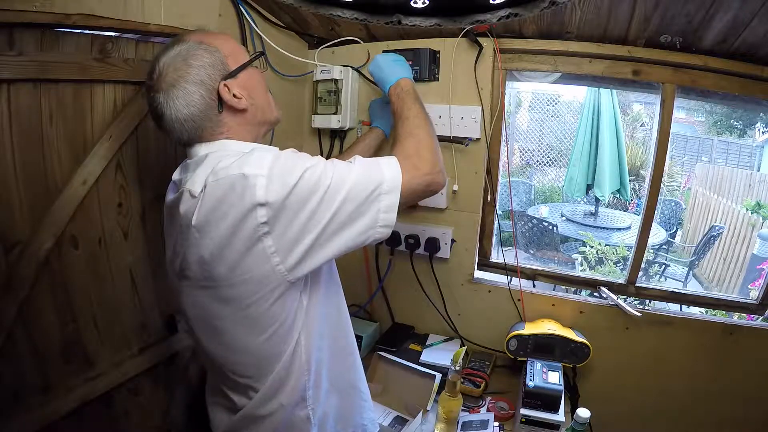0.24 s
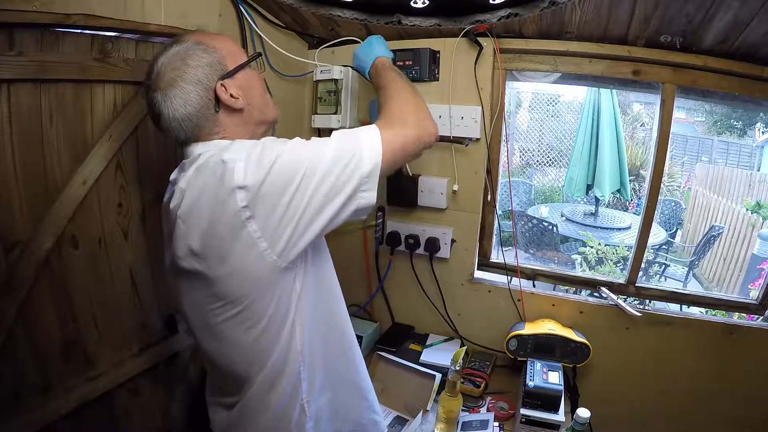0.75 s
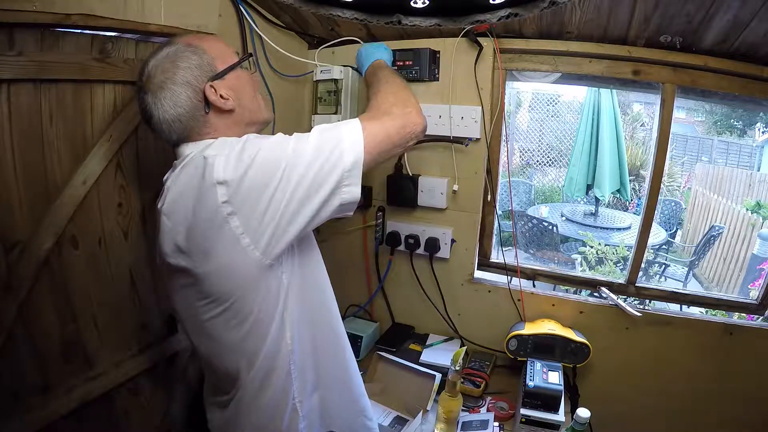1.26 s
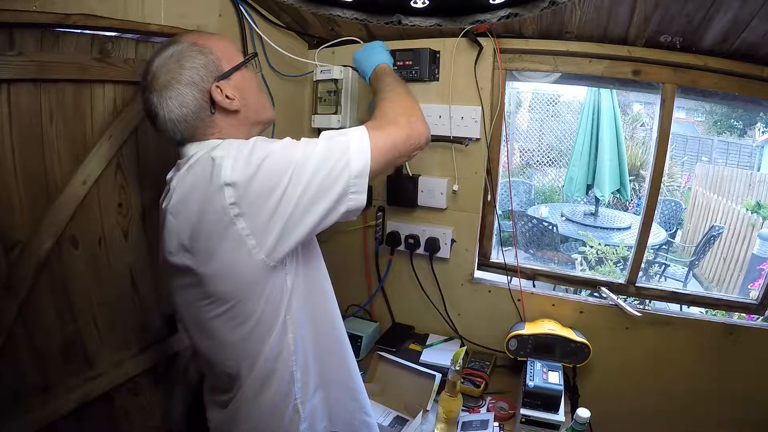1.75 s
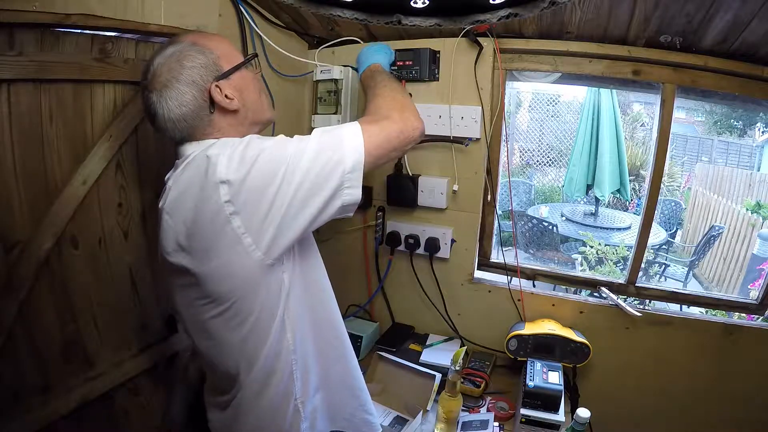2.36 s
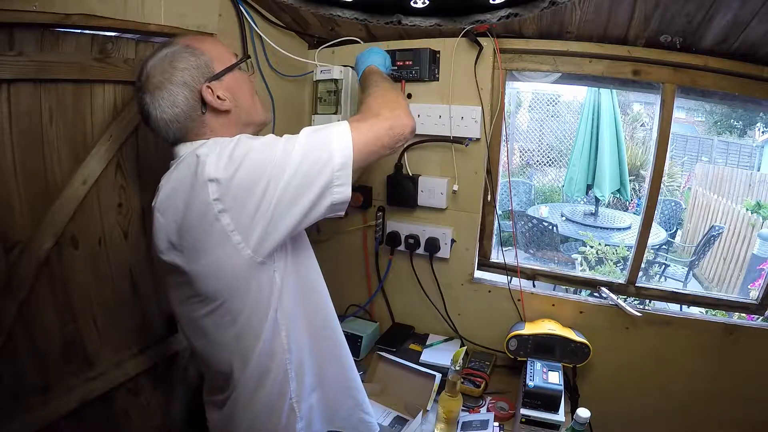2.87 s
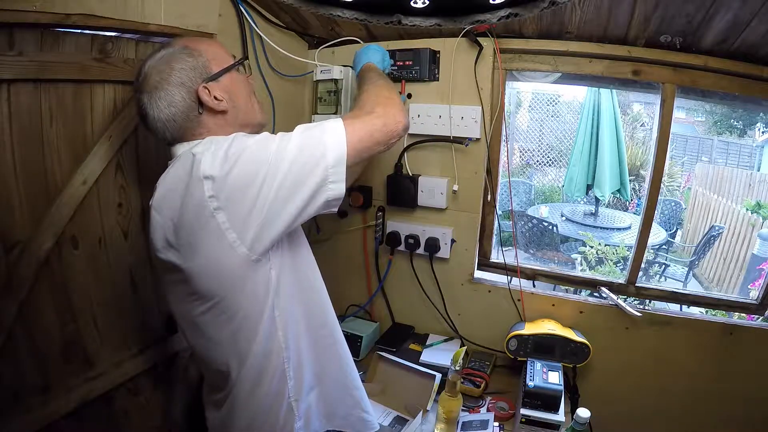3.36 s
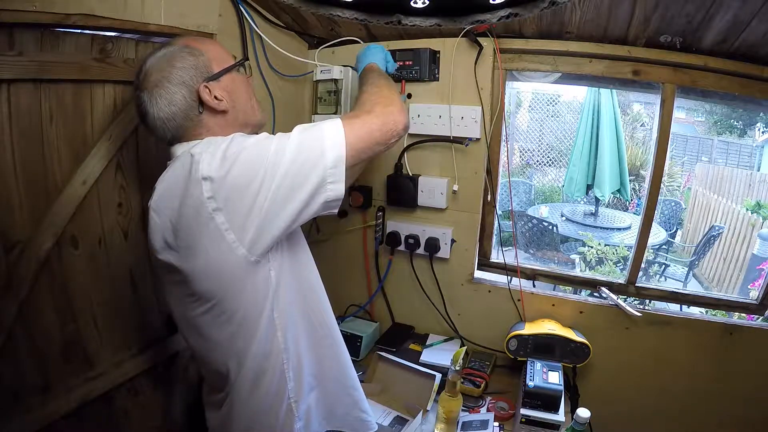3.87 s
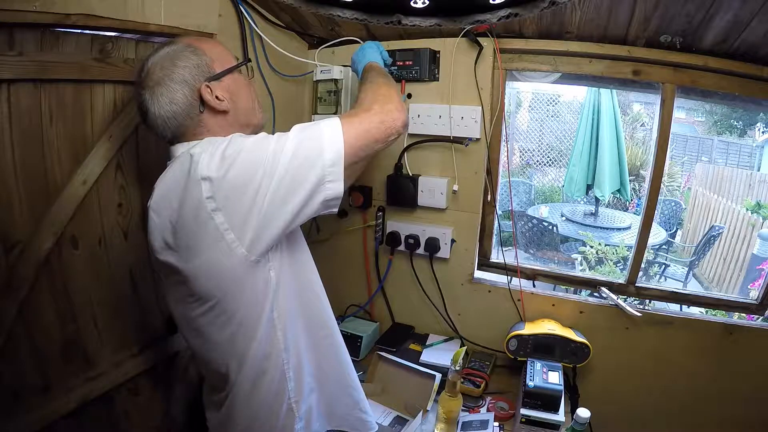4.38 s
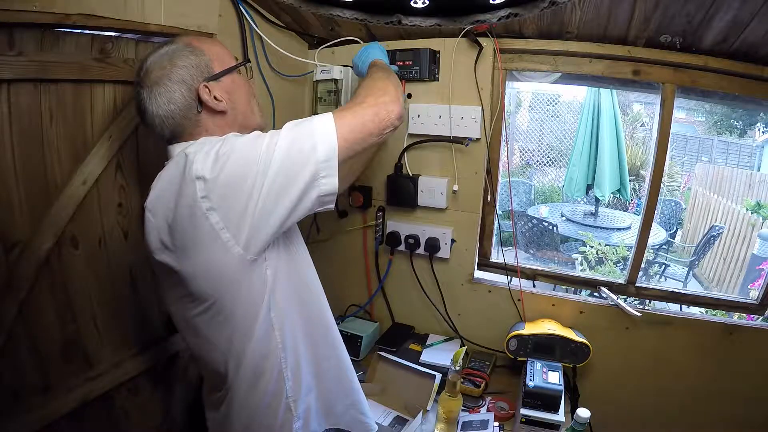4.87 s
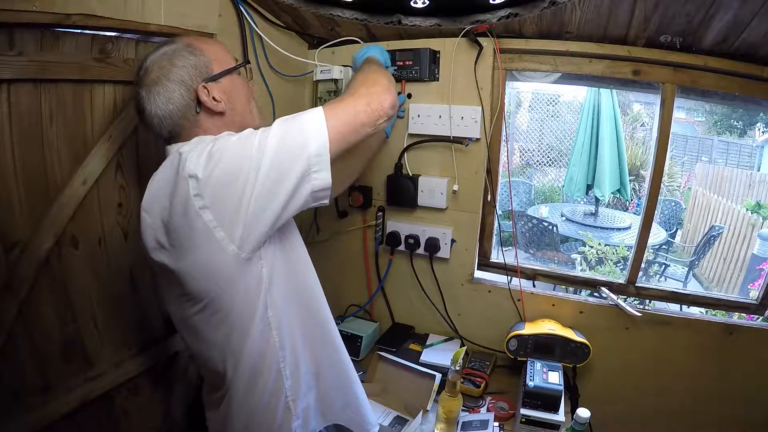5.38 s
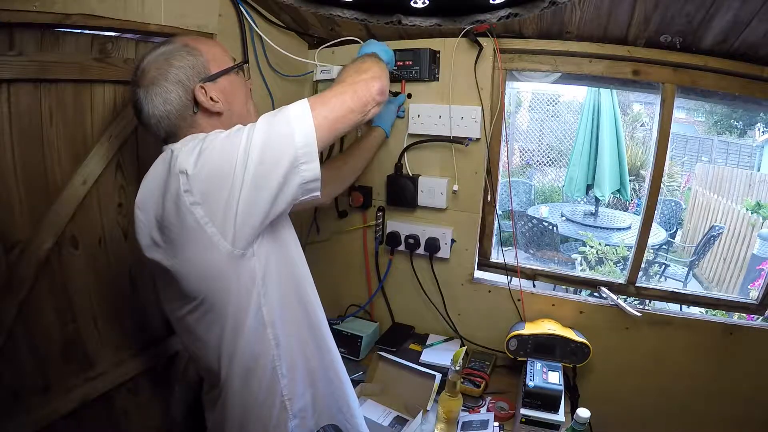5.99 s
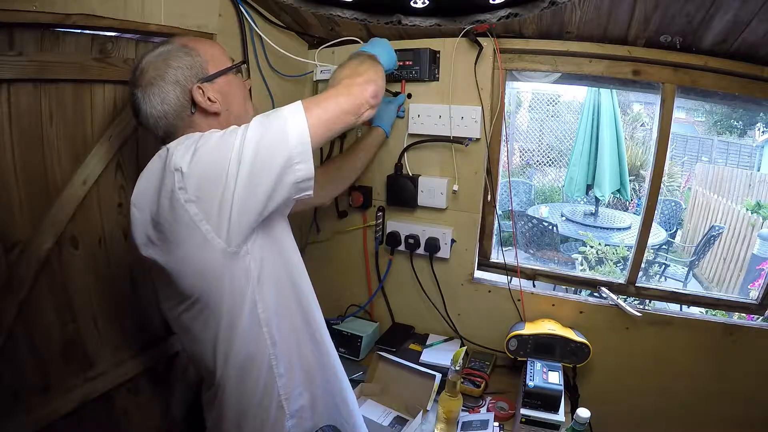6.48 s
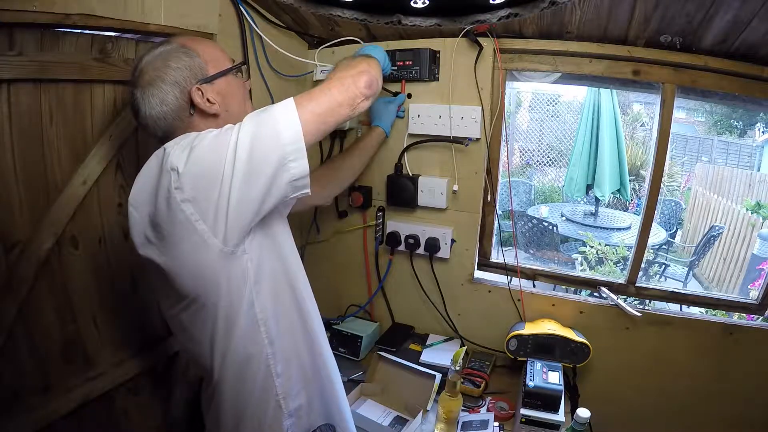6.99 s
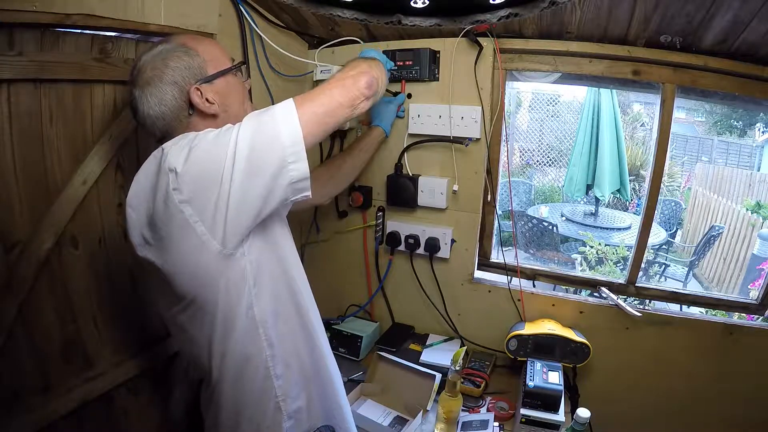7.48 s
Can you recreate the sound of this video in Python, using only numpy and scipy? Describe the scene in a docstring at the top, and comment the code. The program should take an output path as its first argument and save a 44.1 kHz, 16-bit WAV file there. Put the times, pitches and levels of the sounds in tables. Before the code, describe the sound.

Close handling sounds in a small boarded shed: irregular clicks, a quick plastic rattle and two loud snapping knocks in the first two seconds, the later one shaking the wall. After a quieter gap, five regular twisting strokes of rubber glove and cloth rustle softly with wire scratches. Final clicks surround a tiny metal squeak. Under it sit low rumble, faint electrical hum and an early distant bird, all heard by one microphone in the room.

```python
"""At first a bird chatters far off in the garden; mains gear hums faintly throughout, over the air of a small shed.
A gloved hand fits a wire lead to a terminal box on the shed wall: contacts excite modes of box, boards and room.
Early on a plastic part rattles; a few hard blows, two early and one later, boom in the wall.
Five turns of the wrist follow, heard as shaped noise of glove and sleeve with wire ticks and finger bumps.
Near the end the terminal squeaks by stick and slip as it comes tight, among the last clicks."""
import sys
import numpy as np
from scipy import signal
from scipy.fft import rfft, irfft
from scipy.io import wavfile
from scipy.ndimage import uniform_filter1d

SR = 44100
rng = np.random.default_rng(int(sys.argv[2]) if len(sys.argv) > 2 else 0)


def dump_mix(stems):
    """Bounce the given channels to the path in sys.argv[1] as a 16-bit WAV at rate SR."""
    frames = np.atleast_2d(stems).T  # one column per channel
    limited = np.clip(frames, -1, 1)  # hard clip at full scale
    pcm = np.round(limited * 32767).astype(np.int16)
    wavfile.write(sys.argv[1], SR, pcm)


N = 341334
T = np.arange(N) / SR
RING = T[:SR // 2]  # time axis of one ring, half a second

# still air in the shed, spectrum: freq_hz, level_db
AIR_SPECTRUM = [(8, -9.5), (22, 1), (40, -7), (55, -11), (75, -18), (95, -16.5), (125, -26), (400, -35),
                (620, -36), (1150, -41), (2800, -44.5), (5000, -46.5), (8500, -52.5), (15000, -56)]
AIR_DB = -47.5  # rms before the rumble wanders

# mains hum, one entry per harmonic: harmonic number: level_db (rms, before its slow waver)
HUM_HARMONICS = {3: -72.5, 4: -73.5, 5: -75, 6: -70.5, 10: -66.5, 14: -81.5, 16: -78.5}
MAINS_HZ = 50

# spectrum of the bird's harsh note: freq_hz, level_db
BIRD_SPECTRUM = [(1000, -24), (1550, -10), (1900, -6.5), (2650, -3), (2950, -5.5), (3400, -26), (5600, -20),
                 (8000, -43)]
# the bird repeats one note at an even pace and trails off; its level is that at time zero
CHATTER_START_S, NOTE_GAP_S, CHATTER_DB, CHATTER_FADE_DB_PER_S = 0.006, 0.106, -57.5, 8

# five turns of the wrist tighten the terminal: start_s, grip_db, sleeve_sweep_db
WRIST_TURNS = [(2.645, -1, 0), (3.249, -1, -2.5), (3.803, 1.5, -0.5), (4.41, 0, 1.5), (4.995, -1, -3)]
# twist, release and new grip in every turn: after_twist_s, rise_s, glove_rub_db, sleeve_hiss_db
TURN_MOVES = [(0, 0.038, -62.5, -66.5), (.178, 0.025, -77, -67.5), (.305, .036, -71.5, -68.5)]
# brushing strokes: arm shifts before and after tightening, and one short brushing tick near the end:
# peak_s, rise_s, level_db
BRUSH_STROKES = [(1.208, 0.018, -66), (1.44, .024, -70.5), (2.365, 0.032, -67.5), (5.411, .045, -68.5),
                 (5.51, 0.021, -67), (5.772, 0.01, -67), (6.05, .04, -64.5), (6.68, 0.03, -65),
                 (6.78, 0.051, -72), (7.41, 0.0054, -65), (7.455, 0.025, -66.5)]
BRUSH_HISS_DB = 0  # sleeve hiss against glove rub
STROKE_FALL = 1.98  # a stroke falls this many times slower than it rises
# spectrum of the glove's rub: freq_hz, level_db
RUB_SPECTRUM = [(200, -15), (700, 6), (1500, -14), (2900, -5), (3950, 4), (5500, -0.5), (7500, -15),
                (15000, -22)]
# spectrum of the sleeve's hiss: freq_hz, level_db
HISS_SPECTRUM = [(500, -34), (2000, -3.5), (6000, -2), (10500, -1.5), (15000, -7.5)]

# hard blows that shake the whole wall: start_s, level_db (gain on the wall modes)
WALL_BLOWS = [(0.349, -14.5), (0.403, -10.5), (2.058, 4)]
# slow modes of the wall: freq_hz, level_db, t60_s
WALL_MODES = [(26, -31.5, 1), (46.8, -38, 0.33), (66, -35.5, .35), (90, -34, 0.38), (123, -32, 0.27),
              (163, -35, 0.17)]

# modes of the plastic part: freq_hz, level_db (over its spectrum)
PLASTIC_MODES = [(296, 1), (581, -6), (705, -3), (1265, 9), (1863, 6), (2175, -3), (3176, 12), (3290, 10),
                 (4360, -12)]
# spectrum of a blow on the plastic part: freq_hz, level_db
PLASTIC_SPECTRUM = [(120, 4.5), (700, 6.5), (1000, -3.5), (1900, 1), (2700, -6.5), (3300, -2), (3700, -13),
                    (4400, -10), (5300, -15), (6500, -23), (15000, -34)]
# the loose part bounces at an even pace, weaker each time
RATTLE_S, RATTLE_DB, BOUNCE_GAP_S, BOUNCE_LOSS_DB = 0.3575, -38, 0.0092, 5.5

# narrow modes of the box, boards and little room: freq_hz, level_db (over the spectrum of the blow)
BOX_MODES = [(245, 6), (301, 10), (415, -10), (441, 2.5), (493, 4.5), (528, -8), (568, 2.5), (649, -8),
             (689, 5.5), (746, 2), (797, -14.5), (834, -4), (912, 3), (966, 5), (1018, 0.5), (1219, 4),
             (1367, -1.5), (1400, -4.5), (1528, 1.5), (1572, -8.5), (1639, -5), (1701, -11), (1775, -4),
             (1868, -3.5), (2194, 5), (2301, -8.5), (2406, 2), (2492, -4), (2829, 0.5), (2951, 1)]
# spectrum of a blow on the box: freq_hz, level_db
BOX_SPECTRUM = [(170, -16.5), (290, -5), (360, -10.5), (445, 1.5), (780, 2), (1130, -10), (1600, -1),
                (2050, -15), (2400, -11), (3200, -21.5), (3900, -26.5), (6000, -32.5), (8500, -39.5),
                (15000, -53)]
BOX_T60_S, SHED_T60_S = 0.11, 0.17
# push of the briefest contact, spectrum: freq_hz, level_db
HARD_CONTACT = [(260, 0.5), (400, 0), (780, -2), (950, -1), (1250, .5), (1600, 1.5), (2600, 0.5), (3300, 3),
                (6000, 10.5)]

# faint bumps of the fingers while tightening
FUMBLE_DB, FUMBLE_MS, FUMBLE_THUD_DB, FUMBLE_SCATTER_DB = -65, 0.4, 1, 1

# the wire drags over the box: start_s, level_db (before the contact filter),
# contact_ms (of each catch), thud_db (of the boards)
WIRE_SCRAPES = [(0.541, -49, 1.4, 0), (1.446, -60.5, .35, 2), (1.482, -51.5, 0.85, 2),
                (2.636, -55, 0.46, -5), (4.367, -50.5, 1.24, 7), (5.334, -61, .2, 3), (6.538, -60, 0.16, 1),
                (6.642, -53.5, 0.31, 4)]
SCRAPE_S = 0.018

# squeaks of the tightening terminal: start_s, length_s, slip_rate_hz, pitch_hz (the one that rings), level_db
SQUEAKS = [(6.065, 0.043, 345, 690, -43), (6.654, .018, 1130, 2260, -61)]

# clicks and knocks on the box, long contacts for a fingertip and brief ones for metal:
# start_s, level_db (before the contact filter), contact_ms, thud_db (of the boards)
KNOCKS = [(0.002, -45, 0.21, 6), (0.461, -40, 1.24, 3), (0.518, -51.5, 1.16, 8), (0.924, -50, 0.8, 2),
          (1.470, -51.5, 0.37, -5), (1.500, -24.5, 0.34, 1), (1.738, -51, 0.75, 7), (2.056, -29, 1.06, -17),
          (2.06, -16, 0.18, 1.5), (2.614, -51, 0.084, -8), (4.334, -55.5, 0.57, 15),
          (5.2619, -48.5, 0.9, 4), (5.9623, -37.5, 0.31, 1), (6.1465, -37, 0.37, -1),
          (6.630, -49, 0.89, -4), (6.756, -53, 1.35, 8.5), (7.4724, -50, 0.3, 3), (7.572, -49.5, .08, 0)]

TOP_HZ = 15200  # upper band limit


def undb(db):
    """Decibels are logarithmic: convert them to amplitude gain."""
    return 10 ** (np.asarray(db) / 20)


def unit(x):
    """Mean power sets level: scale to rms 1."""
    return x / np.sqrt(np.mean(x ** 2))


def unit_hit(x):
    """Energy sets the level of a transient: scale it to equal rms 1 held for 30 ms."""
    return x / np.sqrt(np.sum(x ** 2) / (0.03 * SR))


def colour(x, points, size=4096):
    """Minimum phase: folding the cepstrum gives a causal filter through (Hz, dB) points."""
    hz, db = np.transpose(points)
    freqs = np.maximum(np.arange(size // 2 + 1) * SR / size, 1)
    gain_db = np.interp(np.log(freqs), np.log(hz), db)
    cepstrum = irfft(np.log(undb(gain_db)))
    cepstrum[1:size // 2] *= 2
    cepstrum[size // 2 + 1:] = 0
    impulse = irfft(np.exp(rfft(cepstrum)))
    return signal.fftconvolve(x, impulse)[:len(x)]


def fade(t60):
    """Exponential free decay: 60 dB are lost in t60 seconds."""
    return np.exp(-np.log(1000) * RING / t60)


def mode(hz, db, t60, wave=np.sin):
    """Damped oscillator: one mode rings at its own frequency and dies away."""
    return undb(db) * wave(2 * np.pi * hz * RING) * fade(t60)


def add(out, s, sound):
    """Superposition: mix a sound in at time s."""
    start = max(int(s * SR), 0)
    out[start:start + len(sound)] += sound[:N - start]


def walk(rate):
    """Band-limited chance: random steps, rate per second, smoothed to a spread near 1."""
    k = max(int(SR / rate), 1)
    steps = np.repeat(rng.standard_normal(N // k + 1), k)[:N]
    return 1.2 * uniform_filter1d(steps, k)


def swell(s, half_s):
    """Gaussian envelope: a bell-shaped rise and fall around time s."""
    return np.exp(-0.5 * ((T - s) / half_s) ** 2)


def response(modes, points, t60, modes_db, room_db, build_s, spread_s):
    """Impulse response of body and room: direct crack, ringing modes, dense echoes of the shed."""
    # dispersion: bending waves carry the highs first, which smears the crack
    freqs = np.arange(len(RING) // 2 + 1) * SR / len(RING)
    delay = spread_s * np.sqrt(1000 / (freqs + 200))
    crack = irfft(np.exp(-2j * np.pi * np.cumsum(delay) * freqs[1]))
    build = 1 - np.exp(-RING / build_s)
    ring = build * sum(mode(hz, db, t60, np.cos) for hz, db in modes)
    echoes = build * rng.standard_normal(len(RING)) * fade(SHED_T60_S)
    # in so small a room the lows live in single modes; only the highs are dense
    echoes = colour(echoes, [(700, -10), (1600, -8.5), (3500, -4.5)])
    arrivals = unit_hit(crack) + undb(modes_db) * unit_hit(ring) + undb(room_db) * unit_hit(echoes)
    return unit_hit(colour(arrivals, points))


def contact(contact_ms, thud_db, steepness=5.8, floor_db=-28):
    """Contact-time low-pass: a push loses the highs above one over its duration; the boards add a low thud."""
    hz, db = np.transpose(HARD_CONTACT)
    passed_power = 1 / (1 + (hz * contact_ms / 1000) ** steepness)
    thud = thud_db * (hz == hz[0])
    return np.column_stack([hz, db + thud + 10 * np.log10(passed_power + undb(floor_db) ** 2)])


def air(rumble_drift_db=-0.5):
    """Broadband noise: low outdoor rumble wanders behind the boards, under a smooth faint hiss."""
    noise = undb(AIR_DB) * unit(colour(rng.standard_normal(N), AIR_SPECTRUM, size=16384))
    rumble = signal.sosfiltfilt(signal.butter(2, 130, fs=SR, output="sos"), noise)
    hiss = noise - rumble
    return hiss + rumble * undb(rumble_drift_db * walk(5))


def hum(waver_db=1.0):
    """Harmonic series: a transformer buzzes on multiples of the mains, each wavering slowly in level."""
    out = np.zeros(N)
    for k, db in HUM_HARMONICS.items():
        peak = np.sqrt(2) * undb(db + waver_db * walk(4.2))
        out += peak * np.sin(2 * np.pi * (k * MAINS_HZ * T + rng.random()))
    return out


def bird(note_s=0.024, rasp_hz=420, garden_t60_s=0.48, garden_db=-3, count=8):
    """Pulsed noise and reverberation: rasping notes, smeared by the garden's echoes."""
    phase = np.cumsum(rasp_hz * (1 + 0.087 * walk(150))) / SR % 1
    pulses = rng.standard_normal(N) * np.exp(-phase / 0.31)
    rasp = unit(colour(pulses, BIRD_SPECTRUM))
    beats = sum(swell(CHATTER_START_S + k * NOTE_GAP_S, note_s) for k in range(count))
    notes = rasp * beats * undb(CHATTER_DB - CHATTER_FADE_DB_PER_S * T)
    garden = rng.standard_normal(len(RING)) * fade(garden_t60_s)
    echoes = signal.fftconvolve(notes, garden / np.linalg.norm(garden))[:N]
    return notes + undb(garden_db) * echoes


def stroke(s, rise_s):
    """Asymmetric envelope: a stroke swells up to time s and dies away more slowly."""
    return np.where(T < s, swell(s, rise_s), swell(s, rise_s * STROKE_FALL))


def hand():
    """Power summation: glove rub and sleeve hiss strengths over all turns and brushing strokes."""
    moves = [(s + after_s, rise_s, grip_db + rub_db, sweep_db + hiss_db)
             for s, grip_db, sweep_db in WRIST_TURNS
             for after_s, rise_s, rub_db, hiss_db in TURN_MOVES]
    moves += [(s, rise_s, db, db + BRUSH_HISS_DB) for s, rise_s, db in BRUSH_STROKES]
    power = sum(np.outer(undb([rub_db, hiss_db]), stroke(s, rise_s)) ** 2
                for s, rise_s, rub_db, hiss_db in moves)
    return np.sqrt(power)


def rustle(box, grain_db=1.5, uneven_db=1.2, ticks_per_s=55, tick_db=-1.5):
    """Friction noise: glove rubs and sleeve hisses in strokes; the wire scratches the box in ticks."""
    rub, hiss = hand()
    fibres = rng.standard_normal((2, N)) * undb(grain_db * walk(820) + uneven_db * walk(50))
    catches = (rng.random(N) < ticks_per_s / SR) * rng.standard_normal(N)
    scratch = signal.fftconvolve(catches, box)[:N]
    scratch = colour(scratch, [(500, -8.5), (1500, -8), (4000, 0.5)])
    glove = unit(colour(fibres[0], RUB_SPECTRUM)) + undb(tick_db) * unit(scratch)
    sleeve = unit(colour(fibres[1], HISS_SPECTRUM))
    return rub * glove + hiss * sleeve


def wall():
    """Low plate modes: the boards boom after the heaviest blows."""
    out = np.zeros(N)
    # neighbouring modes start in opposite phase
    boom = sum((-1) ** k * mode(hz, db, t60) for k, (hz, db, t60) in enumerate(WALL_MODES))
    for s, db in WALL_BLOWS:
        add(out, s, undb(db) * boom)
    return out


def rattle(count=4):
    """Repeated impact with loss: a plastic part bounces a few times in quick succession."""
    out = np.zeros(N)
    plastic = response(PLASTIC_MODES, PLASTIC_SPECTRUM, t60=0.22, modes_db=3.0, room_db=14,
                       build_s=0.0038, spread_s=0.00079)
    for k in range(count):
        add(out, RATTLE_S + k * BOUNCE_GAP_S, undb(RATTLE_DB - k * BOUNCE_LOSS_DB) * plastic)
    return out


def fumbles(box, count=11):
    """Soft random impacts: faint finger bumps, scattered from the first twist to the last new grip."""
    out = np.zeros(N)
    bump = colour(box, contact(FUMBLE_MS, FUMBLE_THUD_DB))
    first_s = WRIST_TURNS[0][0]
    last_s = WRIST_TURNS[-1][0] + TURN_MOVES[-1][0]
    for k in range(count):
        s = first_s + (last_s - first_s) * (k + rng.random()) / count
        db = FUMBLE_DB + FUMBLE_SCATTER_DB * rng.standard_normal()
        add(out, s, undb(db) * bump)
    return out


def scrapes(box, catches_per_s=900):
    """Sliding friction: a dragging wire catches many times in a row, too fast to hear each tick."""
    out = np.zeros(N)
    pressure = np.sin(np.pi * np.minimum(RING / SCRAPE_S, 1))
    for s, db, contact_ms, thud_db in WIRE_SCRAPES:
        catches = (rng.random(len(RING)) < catches_per_s / SR) * rng.standard_normal(len(RING))
        friction = pressure * (catches + 0.078 * rng.standard_normal(len(RING)))
        sound = unit_hit(signal.fftconvolve(friction, box)[:len(RING)])
        add(out, s, undb(db) * colour(sound, contact(contact_ms, thud_db)))
    return out


def squeaks(box, rough=0.023, uneven_db=5, flank_db=-6):
    """Stick-slip: metal sticks and slips in an uneven rhythm, and each slip rings the box."""
    out = np.zeros(N)
    for s, length_s, slip_hz, ring_hz, db in SQUEAKS:
        slip_phase = np.cumsum(slip_hz * (1 + rough * walk(200)[:len(RING)])) / SR
        pressure = (RING < length_s) * (0.5 + np.sin(np.pi * RING / length_s) ** 2)
        # one impulse each time the phase passes a whole number
        impulses = np.diff(np.floor(slip_phase), prepend=-1)
        slips = impulses * pressure * undb(uneven_db * walk(267)[:len(RING)])
        sound = signal.fftconvolve(slips, box)[:len(RING)]
        resonance = [(ring_hz / 2, flank_db / 2), (ring_hz, 0),
                     (ring_hz * 1.4, flank_db), (ring_hz * 2, flank_db * 2.8)]
        add(out, s, undb(db) * unit_hit(colour(sound, resonance)))
    return out


def knocks(box):
    """Impact excitation: long soft contacts mostly thud; brief hard ones add clack and snap."""
    out = np.zeros(N)
    for s, db, contact_ms, thud_db in KNOCKS:
        add(out, s, undb(db) * colour(box, contact(contact_ms, thud_db)))
    return out


def scene():
    """Superposition of all sources at one microphone."""
    box = response(BOX_MODES, BOX_SPECTRUM, t60=BOX_T60_S, modes_db=-8.5, room_db=7,
                   build_s=0.0023, spread_s=0.0014)
    background = air() + hum() + bird()
    handling = rustle(box) + wall() + rattle() + fumbles(box) + scrapes(box) + squeaks(box) + knocks(box)
    return (background + handling)[None]


def record(dry):
    """Band limiting: a steep elliptic low-pass removes the top of the spectrum."""
    return signal.sosfilt(signal.ellip(12, 0.1, 70, TOP_HZ, fs=SR, output="sos"), dry)


dry = scene()
out = record(dry)
dump_mix(out)
```